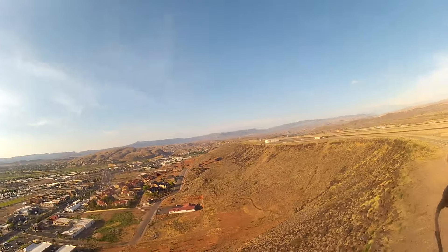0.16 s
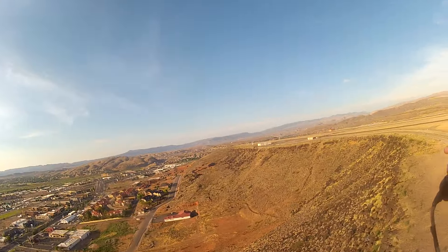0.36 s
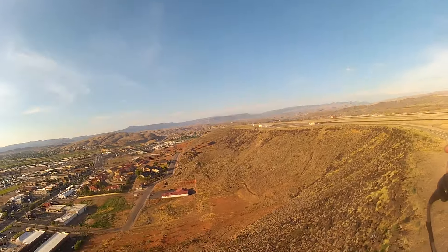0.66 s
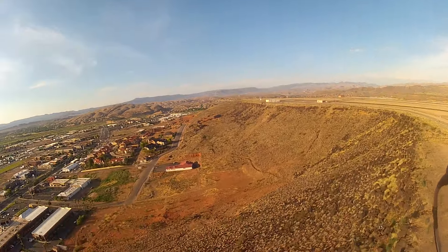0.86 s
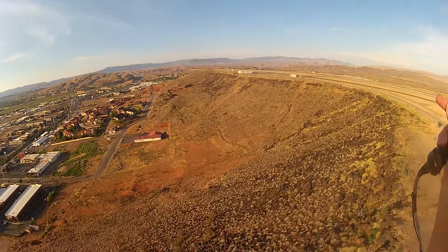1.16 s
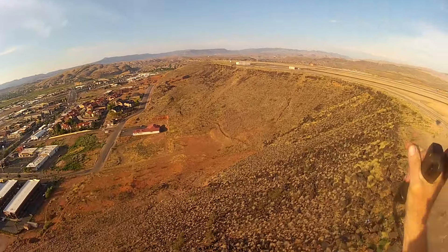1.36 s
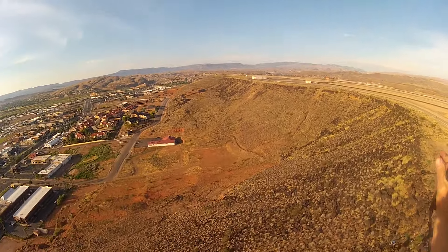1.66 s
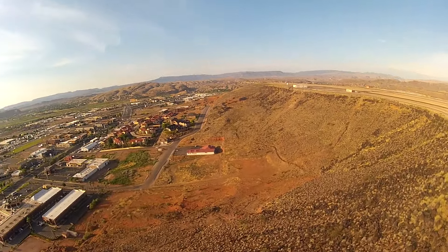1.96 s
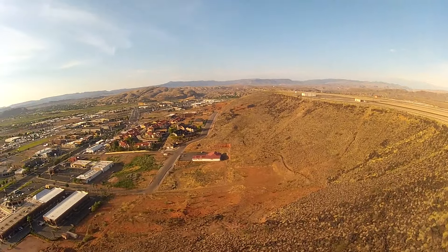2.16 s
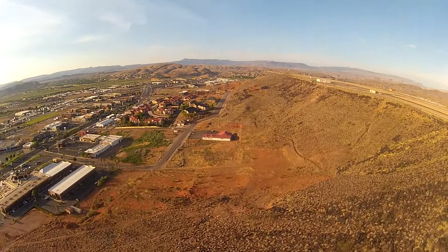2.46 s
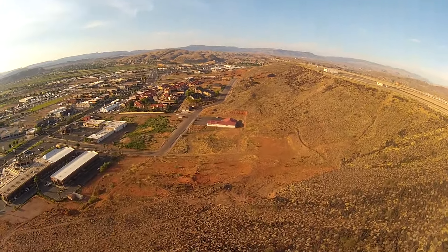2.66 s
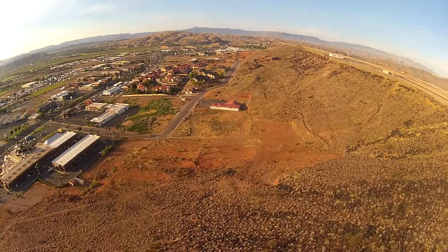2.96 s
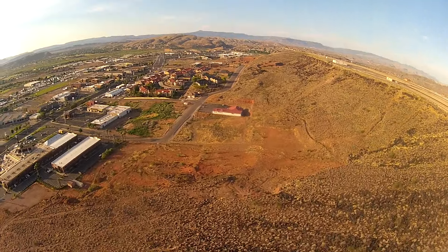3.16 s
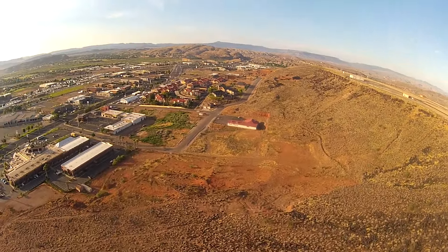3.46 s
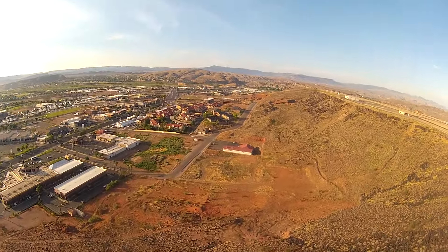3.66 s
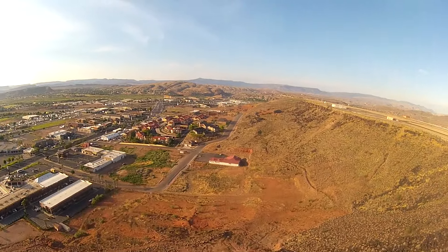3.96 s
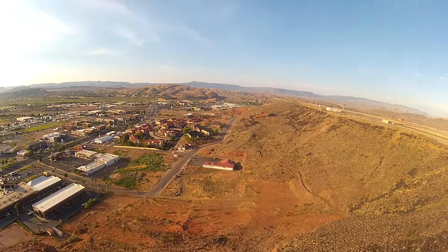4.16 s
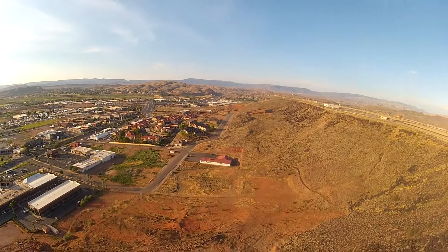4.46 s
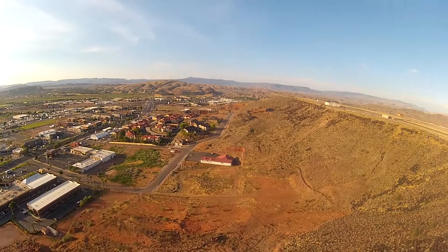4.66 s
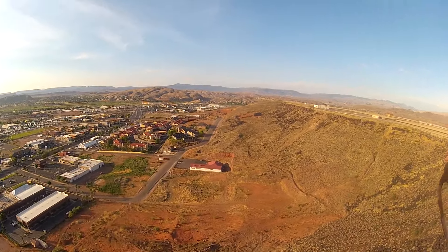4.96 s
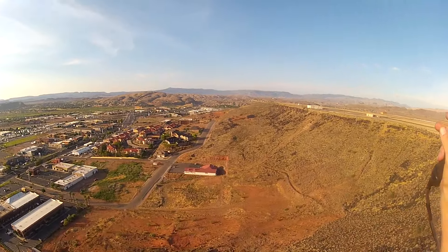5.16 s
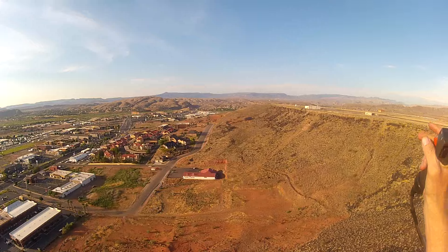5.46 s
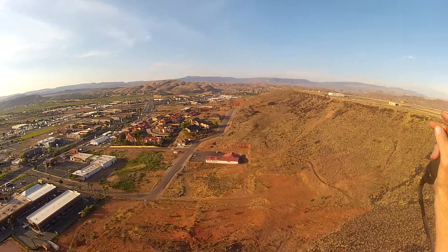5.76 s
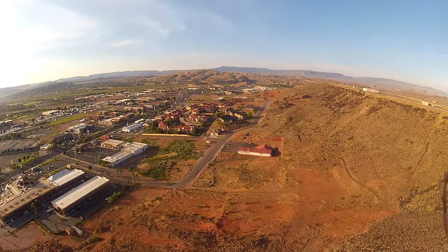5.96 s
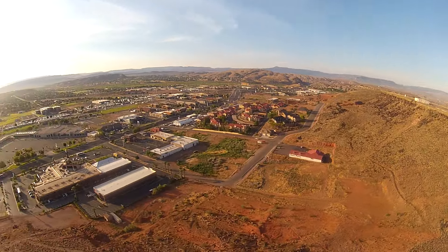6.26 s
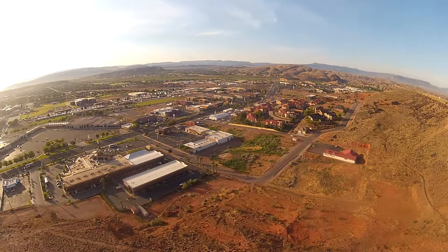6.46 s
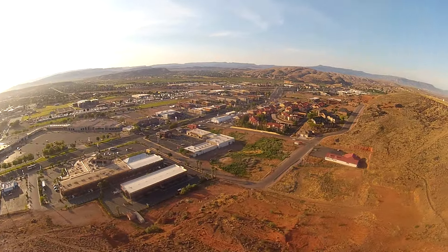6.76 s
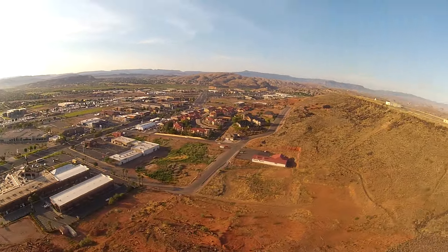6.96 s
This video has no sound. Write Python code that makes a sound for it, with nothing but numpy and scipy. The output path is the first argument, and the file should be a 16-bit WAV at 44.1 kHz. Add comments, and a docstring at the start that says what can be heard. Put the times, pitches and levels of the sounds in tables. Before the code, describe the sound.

A small two-stroke paramotor engine buzzes close by in flight, with a raspy propeller. It sags, knocks a few times and quits, falling in pitch to a low throb that dies away. Quieter wind remains, rumbling on the pilot's microphone and hissing in gusts. The glider lines whistle faintly, rising and then falling, and the hiss swells sharply near the end.

```python
"""A paramotor in flight, heard at the pilot's camera. The two-stroke sags, knocks and barks, quits at 1 s,
and is spun down by propeller drag, shaking the frame until it stops near 3 s. Wind remains: it buffets
the camera case, rushes round it and hisses at its edge as the head turns. Vortex shedding makes the
glider lines sing, most strongly near 5 s; then a buckle ticks, and the hiss peaks after 6 s.
Throughout, the camera holds each sample of a low rate, which mirrors the sound into the treble."""
import sys
import numpy as np
from scipy import signal
from scipy.fft import rfft, irfft, next_fast_len
from scipy.io import wavfile
from scipy.ndimage import map_coordinates

SR = 44100
rng = np.random.default_rng(int(sys.argv[2]) if len(sys.argv) > 2 else 0)


def transcribe(signal):
    """Save signal, clipped to [-1, 1], as a 16-bit WAV file at the path in sys.argv[1]."""
    frames = np.atleast_2d(signal).T
    limited = np.clip(frames, -1, 1)
    pcm = np.round(limited * 32767).astype(np.int16)
    wavfile.write(sys.argv[1], SR, pcm)


N = 313110

RUN_HZ, LOADED_HZ = 132.97, 112.4  # crank speed at full power; speed below which the whole drive fades
QUIT_S, STOP_S, STOP_DB_PER_S = 0.97, 2.7, 70  # firing ends; later, compression halts the last turns

# Spectra of the sources. Each row: frequency in Hz, relative level in dB.
EXHAUST_SPECTRUM = [(40, -3), (110, -15.5), (220, 0.5), (330, 2), (450, -3), (580, -8), (720, -12.5),
                    (900, -8.5), (1350, -17), (1700, -15.5), (2400, -11), (3200, -22), (6000, -50)]
RASP_SPECTRUM = [(40, -6), (150, -8), (400, -8.5), (700, -15.5), (1100, -7.5), (1400, -7), (1750, 0),
                 (2100, -5), (2450, 0.5), (2700, -7.5), (3100, -13), (4000, -16.5), (5000, -22.5),
                 (6000, -31.5)]
FIZZ_SPECTRUM = [(2800, 0), (3400, 1.5), (4000, -7), (4400, -1), (4850, -6), (5250, -6.5), (6000, -8)]
BUFFET_SPECTRUM = [(15, -56), (25, -21), (32, -16), (45, -19), (59, -4), (86, -8), (113, 0), (156, -6.5),
                   (193, 0), (398, -25), (520, -34), (680, -38), (1140, -120)]
RUSH_SPECTRUM = [(200, 0), (480, -11.5), (620, -2.5), (1000, -6), (1400, -5), (1950, -2.5), (2600, -14.5),
                 (3000, -10), (3500, -15.5), (5000, -23.5), (6000, -30.5)]
EDGE_SPECTRUM = [(1000, -34), (1800, -10.5), (2100, -1), (2400, 0), (2680, -1.5), (2950, -12),
                 (3400, -16.5), (4000, -24), (4350, -22.5), (4850, -20), (5250, -30.5), (6000, -26)]
# Propeller harmonics. Each row: multiple of the blade-pass frequency, relative level in dB.
BLADE_HARMONICS = [(1, 3.5), (2, -0.5), (3, -5), (4, -29), (5, -11.5), (6, -13)]
# Peaks and dips. Each row: centre in Hz, width in Hz, gain in dB.
FRAME_MODES = [(103, 21, -21), (63, 6.2, -31.5), (44.7, 8.7, -32)]
CAMERA_BANDS = [(597, 93, 4), (648, 37, -5), (884, 160, 2.5), (1140, 64, -0.5), (1357, 158, 10.5),
                (1806, 50, -8), (2093, 147, 4), (2530, 490, 3), (2970, 420, -4), (3220, 86, 4),
                (3980, 115, -5), (5400, 53, 1), (6020, 300, -8)]  # those of the case, plus the recorder's dip at 6 kHz, half its sample rate
# Impacts. Each row: start in seconds, level of the exciting burst in dB.
FRAME_KNOCKS = [(0.1321, -30), (0.2164, -9), (0.4419, -10), (0.6639, -13), (0.816, -15), (0.854, -14)]
BUCKLE_TICKS = [(5.5726, -37)]
# Strength of the airflow on the case. Each row: time in seconds, relative level in dB.
BUFFET_LEVELS = [(1.7, -34), (1.76, -37.5), (2.11, -32), (2.36, -41.5), (2.38, -33.5), (4.05, -35.5),
                 (4.09, -31.5), (4.96, -32), (5.01, -36), (5.1, -31.5), (5.62, -34), (5.76, -38.5),
                 (5.89, -30.5), (7.1, -34)]
RUSH_LEVELS = [(1.8, -45.5), (2.27, -44), (3.1, -49.5), (4.21, -44), (4.38, -46.5), (6.4, -43),
               (6.8, -45.5), (7.1, -43.5)]
# Vortex tone of the glider lines. Each row: time in seconds, frequency in Hz, level in dB.
LINE_SONG = [(1.8, 609, -56), (3.6, 624.2, -53.5), (3.9, 719, -52), (4.7, 900, -46), (5.45, 928, -51),
             (6.2, 866, -48), (6.6, 766, -47), (7.1, 710, -54)]
# Swells. Each row: time of full level, rise time and hold time, all in seconds, then level in dB.
EDGE_SWELLS = [(2.38, 0.95, 0.42, -35.5), (3.22, 0.31, 0.38, -39.5), (3.63, .1, 0.1, -34),
               (4.64, 0.14, .2, -51), (5.92, 0.54, 0.021, -43), (6.15, 0.21, 0.094, -35),
               (6.345, 0.077, 0.067, -27.5), (6.5, .3, 0.4, -47), (6.97, 0.14, .05, -34.5)]  # the head turns the case's edge into the wind
THIN_LINE_SWELLS = [(5.3, 0.8, 0.35, -48)]  # a thinner line catches the fastest air
EDDY_SWELLS = [(6.3, 0.51, 0.633, -48), (6.36, 0.11, 0.068, -54)]  # small eddies form in the widest head turns


def amp(db):
    """Amplitude ratio of a level in decibels."""
    return 10 ** (np.asarray(db) / 20)


def unit(x):
    """x normalised to rms 1."""
    return x / np.sqrt(np.mean(x ** 2) + 1e-20)


def spectrum_gain(spectrum, hz):
    """Gain interpolated in dB over log frequency, rolling off beyond the end points."""
    f, db = np.transpose(spectrum)
    outside = np.maximum(np.log(f[0] / (hz + 1)), 0) + np.maximum(np.log((hz + 1) / f[-1]), 0)
    return amp(np.interp(np.log(hz + 1), np.log(f + 1), db) - 20 * outside)


def curves(rows):
    """Linear interpolation, sample by sample, of each column after the time."""
    times, *columns = np.transpose(rows)
    return [np.interp(np.arange(N) / SR, times, column) for column in columns]


def fade(start_s, db_per_s):
    """Unit gain until start_s, then exponential decay."""
    return amp(-db_per_s * np.maximum(np.arange(N) / SR - start_s, 0))


def wobble(rate):
    """Slow random modulation: a spline through rate knots a second."""
    return map_coordinates(rng.standard_normal(int(N * rate / SR) + 4), [np.arange(N) * rate / SR])


def filtered(x, response):
    """Linear filtering: the spectrum of x times a frequency response."""
    size = next_fast_len(N + SR // 2)
    return irfft(rfft(x, size) * response(np.fft.rfftfreq(size, 1 / SR)), size)[:N]


def convolved(x, impulse_response):
    """Convolution with an impulse response scaled to unit energy."""
    return signal.fftconvolve(x, impulse_response / np.linalg.norm(impulse_response))[:N]


def resound(x, spectrum, size=4096):
    """Response to x of a minimum-phase body with the given spectrum."""
    cepstrum = irfft(np.log(spectrum_gain(spectrum, np.fft.rfftfreq(size, 1 / SR))))
    cepstrum[1:size // 2] *= 2  # folding the cepstrum makes the body causal
    cepstrum[size // 2 + 1:] = 0
    return convolved(x, irfft(np.exp(rfft(cepstrum))))


def noise(spectrum):
    """Coloured noise of rms 1."""
    return unit(filtered(rng.standard_normal(N), lambda hz: spectrum_gain(spectrum, hz)))


def decay(t60, samples=SR // 40):
    """A damped envelope that falls 60 dB in t60 seconds."""
    return amp(-60 * np.arange(samples) / SR / t60)


def bursts(events, t60):
    """Impact excitation: a damped burst of noise for each event."""
    out, envelope = np.zeros(N), decay(t60, SR // 10)
    for start_s, db in events:
        burst = amp(db) * envelope * rng.standard_normal(len(envelope))
        out[round(start_s * SR):][:len(burst)] += burst
    return out


def swells(rows, release_s=0.1):
    """Power sum of envelopes that climb 20 dB per rise time, hold, and fall 20 dB per release_s."""
    t, power = np.arange(N) / SR, np.zeros(N)
    for full_s, rise_s, hold_s, db in rows:
        below = np.maximum(full_s - t, 0) / rise_s + np.maximum(t - full_s - hold_s, 0) / release_s
        power += amp(db - 20 * below) ** 2
    return np.sqrt(power)


def pulses(cycles, scatter_db, jitter):
    """A quasi-periodic train, one uneven pulse a cycle, whose power is independent of its rate."""
    whole = np.arange(1, int(cycles[-1]))
    size, slip = rng.standard_normal((len(whole), 2)).T
    onsets = np.interp(whole + jitter * slip, cycles, np.arange(N)).astype(int)
    return np.bincount(onsets, amp(scatter_db * size) / np.sqrt(np.gradient(cycles)[onsets]), N)


def gate(cycles, depth_db):
    """Periodic amplitude modulation of rms 1, one swell a cycle."""
    return unit(amp(depth_db * np.cos(2 * np.pi * cycles)))


def crank_speed(sag_hz_per_s2=35.5, drag_halving_s=.6, friction_hz_per_s=2.6):
    """Turns a second: the starved engine sags, then coasts against quadratic drag and steady friction."""
    t = np.arange(N) / SR
    powered_hz = RUN_HZ - sag_hz_per_s2 * np.minimum(t, QUIT_S) ** 2
    coast_s = np.maximum(t - QUIT_S, 0)
    return np.maximum(powered_hz / (1 + coast_s / drag_halving_s) - friction_hz_per_s * coast_s, 1)


def driven(db, db_per_octave, full_hz=LOADED_HZ):
    """Gain of a driven part: a power law of crank speed below full_hz, dying away at the stop."""
    octaves = np.minimum(np.log2(crank_speed() / full_hz), 0)
    return amp(db + db_per_octave * octaves) * fade(STOP_S, STOP_DB_PER_S)


def off_pipe(smooth_db, off_s=0.555, rise_s=0.097):
    """Gain that rises from smooth_db to unity as the engine drops out of its tuned pipe's resonance."""
    return amp(smooth_db * np.clip((off_s - np.arange(N) / SR) / rise_s, 0, 1))


def exhaust(turns, silencer_hz=1700):
    """One puff a turn excites the pipe's resonances; as the crank slows, puffs give way to chuffs of air."""
    bark = driven(db=-19, db_per_octave=13.5) * off_pipe(smooth_db=-16)
    chuff_share = np.clip(.9 * (1 - crank_speed() / LOADED_HZ), .03, .8)
    puffs = pulses(turns, scatter_db=1, jitter=.004)
    chuffs = gate(turns, depth_db=-3) * rng.standard_normal(N)
    flow = np.sqrt(1 - chuff_share) * puffs + np.sqrt(chuff_share) * chuffs
    silencer = signal.butter(2, silencer_hz, fs=SR, output="sos")
    return signal.sosfilt(silencer, resound(bark * flow, EXHAUST_SPECTRUM))


def blade_tones(passes):
    """Rotating blade loads radiate harmonics of the blade-pass frequency; coasting blades lose their load."""
    thrust = driven(db=-26.5, db_per_octave=6, full_hz=RUN_HZ) * fade(start_s=1.07, db_per_s=33)
    tones = np.zeros(N)
    for order, db in BLADE_HARMONICS:
        cycles = order * (passes + 0.0057 * wobble(24.4)) + (order > 1) * rng.random()
        waver_db = 1.2 * wobble(8)
        tones -= amp(db + waver_db) * np.sqrt(2) * np.cos(2 * np.pi * cycles)
    return thrust * tones


def blade_rasp(passes):
    """Torn air radiates broadband noise: the same slap from every blade, fresh swirl and a thin swish."""
    slap_shape = decay(t60=.032) * rng.standard_normal(SR // 40)
    slaps = convolved(pulses(passes, scatter_db=1.7, jitter=.003), slap_shape)
    swirl = unit(gate(passes - .1, depth_db=3.3) * amp(1.2 * wobble(220))) * rng.standard_normal(N)
    slap_share = .45 * fade(start_s=.75, db_per_s=18)  # an unloaded blade slaps less
    torn_air = np.sqrt(slap_share) * slaps + np.sqrt(1 - slap_share) * swirl
    rasp = resound(driven(db=-19.5, db_per_octave=18) * torn_air, RASP_SPECTRUM)
    swish = driven(db=-33.5, db_per_octave=10) * noise(FIZZ_SPECTRUM)
    return rasp + swish


def frame_clatter(turns):
    """Impacts ring the steel frame: an uneven tick each turn, and a few harder knocks."""
    hits = pulses(turns, scatter_db=3.5, jitter=.25)
    ticks = convolved(hits, decay(t60=.016)) * rng.standard_normal(N)
    steel_spectrum = [(800, -20), (2400, -3), (3300, -2), (4500, 0), (5300, -4), (5800, -14)]
    shaking = driven(db=-35, db_per_octave=14.5) * off_pipe(smooth_db=-2)
    knocks = resound(bursts(FRAME_KNOCKS, t60=0.015), RASP_SPECTRUM)
    return resound(ticks * shaking, steel_spectrum) + knocks


def frame_shake(turns, slow_hz=40):
    """Forced vibration: the crank sweeps down through the frame's modes; slow turns add a second order."""
    def response(hz):
        powers = (amp(db) ** 2 / (1 + (2 * (hz - f) / width) ** 2) for f, width, db in FRAME_MODES)
        return np.sqrt(sum(powers))

    speed = crank_speed()
    first_order = response(speed) * np.sin(2 * np.pi * turns)
    second_order = response(2 * speed) * np.sin(4 * np.pi * turns)
    throb = first_order + amp(-2.5) / (1 + (speed / slow_hz) ** 6) * second_order
    uneven_db = 3 * np.clip(1 - speed / LOADED_HZ, 0, 1) * wobble(14)  # slow turns differ in force
    weakening = fade(start_s=1.73, db_per_s=7) * fade(STOP_S, STOP_DB_PER_S)
    return np.sqrt(2) * throb * amp(uneven_db) * weakening


def wind():
    """Turbulence buffets the case, rushes round it, rings its edge near 2.4 kHz and fizzes in eddies."""
    buffet = amp(curves(BUFFET_LEVELS)[0] + 1) * noise(BUFFET_SPECTRUM)
    rush = amp(curves(RUSH_LEVELS)[0] + 4 + 0.13 * wobble(21)) * noise(RUSH_SPECTRUM)
    flutter = unit(amp(1.3 * wobble(120)))
    edge = (amp(-51.5) + swells(EDGE_SWELLS)) * flutter * noise(EDGE_SPECTRUM)  # faint between head turns
    fizz = swells(EDDY_SWELLS) * noise(FIZZ_SPECTRUM)
    return buffet + rush + edge + fizz


def glider_lines(width_hz=110, thin_ratio=1.31):
    """Aeolian tones: lines shed vortices at a frequency that rises with airspeed and with thinness."""
    def narrowband(phase):
        return unit(wobble(width_hz) * np.cos(phase) + wobble(width_hz) * np.sin(phase))

    hz, db = curves(LINE_SONG)
    phase = 2 * np.pi * np.cumsum(hz * (1 + 0.014 * wobble(25))) / SR
    turbulence_db = 1.7 * wobble(12)
    song = amp(db) * narrowband(phase)
    thin_song = swells(THIN_LINE_SWELLS) * narrowband(thin_ratio * phase)
    return amp(turbulence_db) * (song + thin_song)


def buckle(ring_hz=5260):
    """A light impact excites the resonance of a small metal harness buckle."""
    return resound(bursts(BUCKLE_TICKS, t60=0.044), [(3000, -30), (4400, -10), (ring_hz, 0), (6000, -5)])


def camera_response(hz):
    """Resonance in the closed case lifts and hollows bands; the recorder dips at half its sample rate."""
    response = 1
    for centre, width, db in CAMERA_BANDS:
        detuning, damping, root_gain = centre ** 2 - hz ** 2, 1j * hz * width, amp(db / 2)
        response = response * (detuning + damping * root_gain) / (detuning + damping / root_gain)
    return response


def scene():
    """Superposition at the camera: engine and propeller share one crank speed; wind blows throughout."""
    turns = np.cumsum(crank_speed() * (1 + .001 * wobble(20))) / SR
    passes = .7335 * turns  # two blades behind a reduction belt
    drive = exhaust(turns) + blade_tones(passes) + blade_rasp(passes)
    frame = frame_clatter(turns) + frame_shake(turns)
    return filtered(drive + frame + wind() + glider_lines() + buckle(), camera_response)[None]


def record(dry, hold_hz=12000, top_hz=15330):
    """Sample and hold: the band below half the rate forms spectral images on both sides of the rate."""
    band = filtered(dry[0], lambda hz: hz < hold_hz / 2)
    sampled = band * (1 + 2 * np.cos(2 * np.pi * hold_hz * np.arange(N) / SR))
    droop = lambda hz: np.sinc(hz / hold_hz) / np.sinc(hz / (4 * hold_hz))
    return filtered(sampled, lambda hz: droop(hz) * (hz < top_hz))[None]


dry = scene()
out = record(dry)
transcribe(out)
```